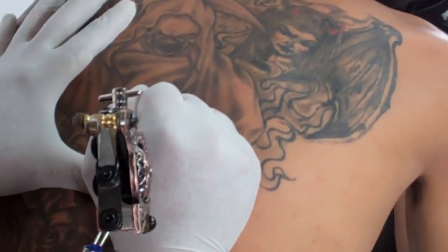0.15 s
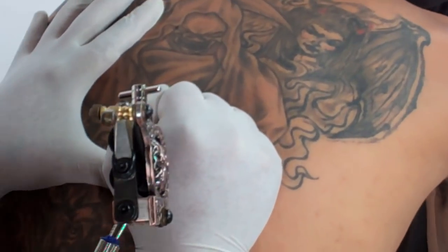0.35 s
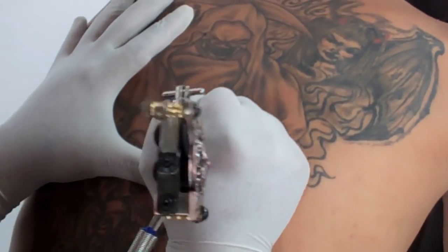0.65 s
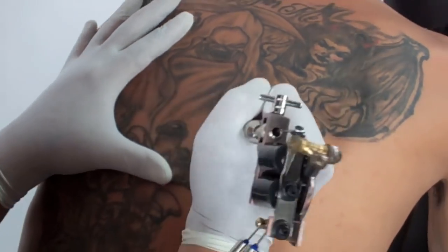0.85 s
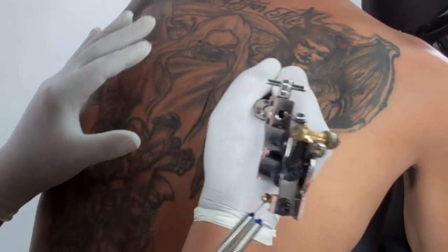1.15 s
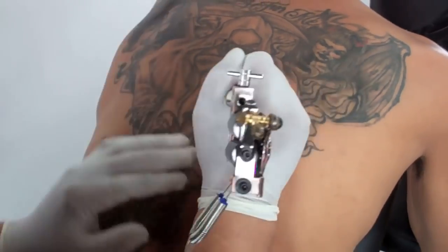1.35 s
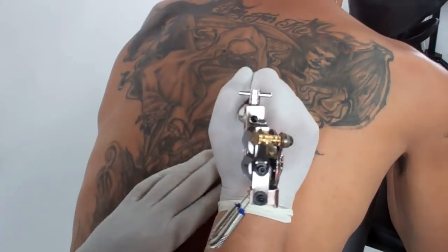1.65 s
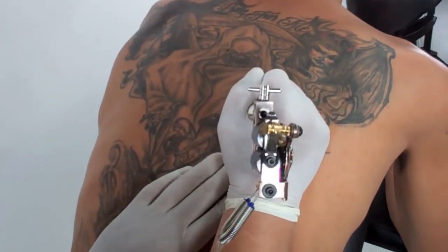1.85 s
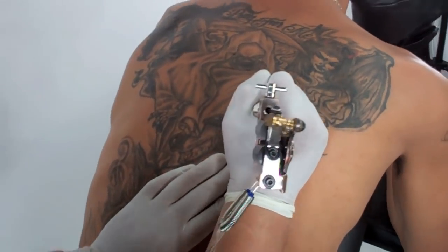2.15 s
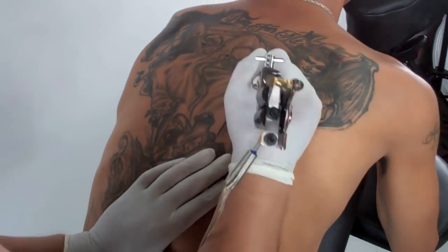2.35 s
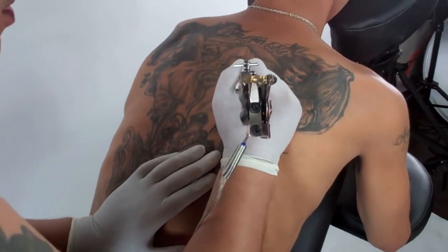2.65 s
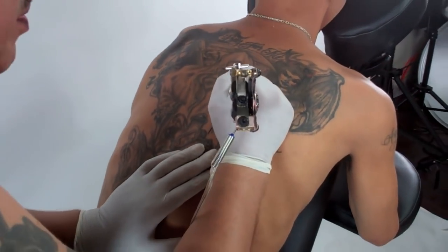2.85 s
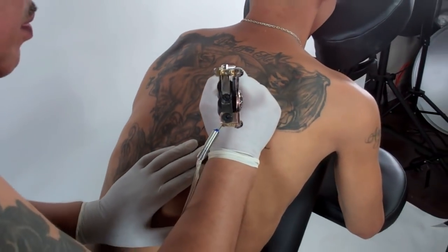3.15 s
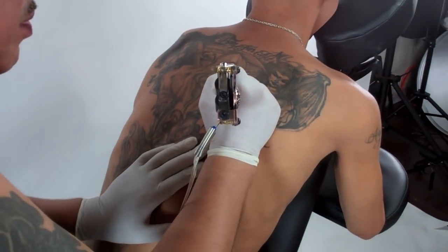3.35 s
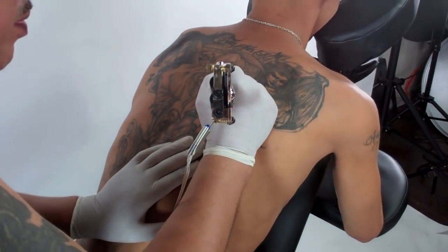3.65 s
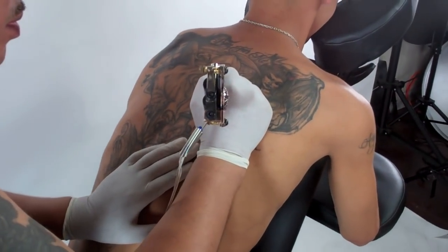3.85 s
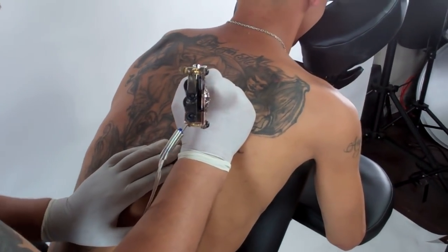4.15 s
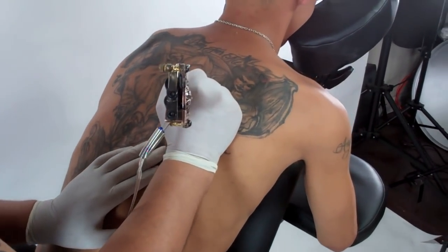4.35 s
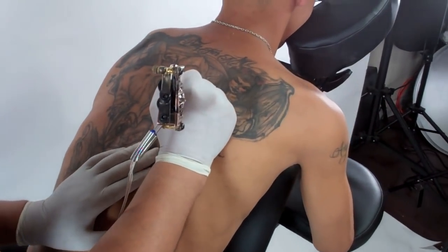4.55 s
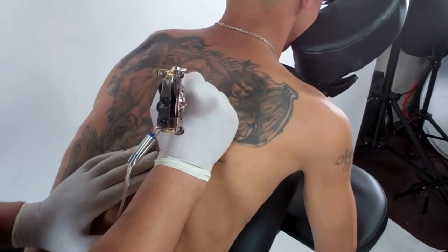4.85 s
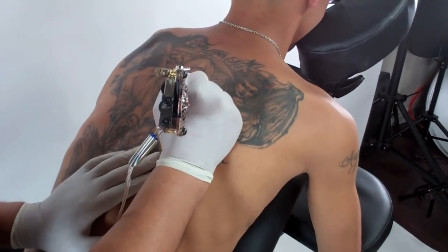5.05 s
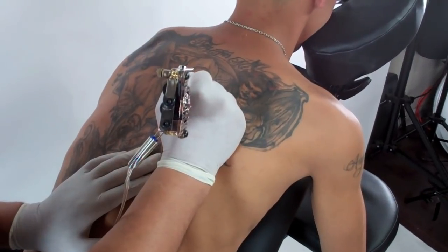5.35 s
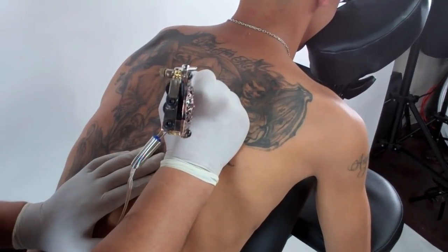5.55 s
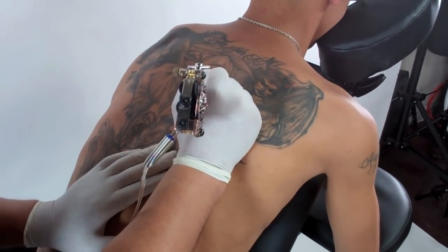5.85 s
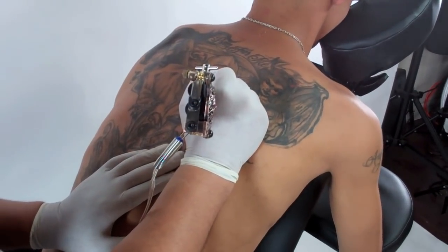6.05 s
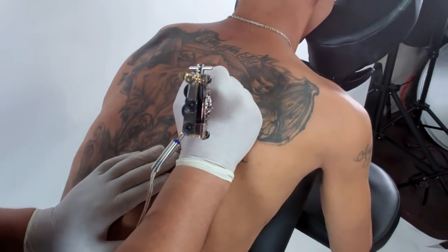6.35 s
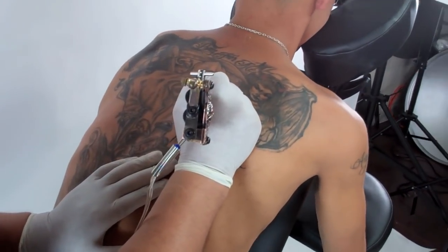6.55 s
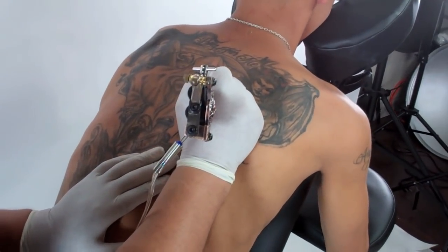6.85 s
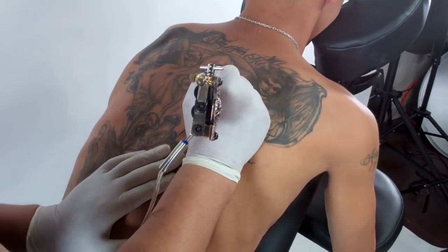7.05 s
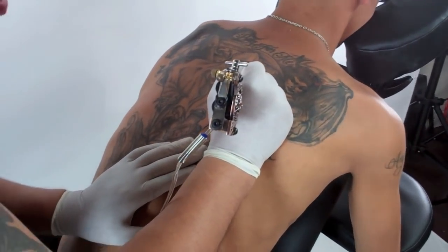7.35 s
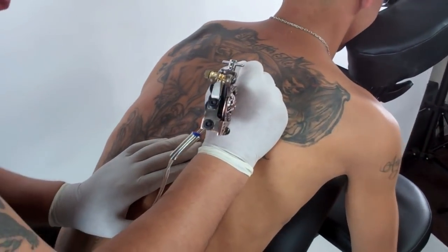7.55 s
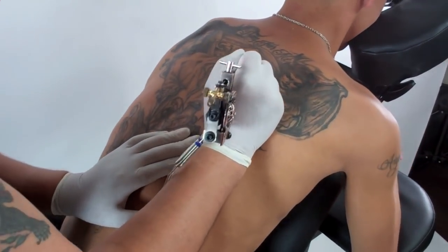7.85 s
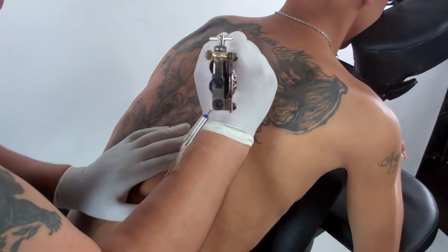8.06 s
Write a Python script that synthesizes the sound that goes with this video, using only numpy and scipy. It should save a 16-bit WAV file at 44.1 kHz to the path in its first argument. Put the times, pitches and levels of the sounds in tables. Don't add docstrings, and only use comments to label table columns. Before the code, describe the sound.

A coil tattoo machine buzzes harshly and continuously close by, bright and metallic, with sizzling hiss and low thumping over a faint room hum.

```python
import sys
import numpy as np
from scipy import signal
from scipy.fft import rfft, irfft, next_fast_len
from scipy.io import wavfile
from scipy.ndimage import uniform_filter1d

SR = 44100
rng = np.random.default_rng(int(sys.argv[2]) if len(sys.argv) > 2 else 0)


def gain_from_db(level_db):
    decades = np.asarray(level_db, float) / 20
    return 10 ** decades


def waveform_to_disk(signal):
    frames = np.transpose(np.atleast_2d(signal))
    scaled = np.clip(frames, -1, 1) * 32767
    samples = np.round(scaled).astype(np.int16)
    wavfile.write(sys.argv[1], SR, samples)


N = 362502


def evened(x):
    return x / np.sqrt(np.mean(x ** 2) + 1e-20)


def curves(rows):
    s, *columns = np.transpose(rows)
    t = np.arange(N) / SR
    return [np.interp(t, s, column) for column in columns]


def bells(x, centre, half):
    return np.exp(-.5 * ((x - np.c_[centre]) / np.c_[half]) ** 2)


def bumps(rows):
    s, half, *columns = np.transpose(rows)
    t = np.arange(0, N / SR + 1, 1 / 500)
    sums = np.array(columns) @ bells(t, s, half)
    return np.array(curves(np.c_[t, sums.T]))


def colour(x, points):
    size = next_fast_len(N)
    hz, db = np.transpose([(0.75, -59)] + list(points))
    log_hz = np.log(np.fft.rfftfreq(size, 1 / SR) + 1)
    gain = gain_from_db(np.interp(log_hz, np.log(hz), db))
    return irfft(rfft(x, size) * gain, size)[..., :N]


def pair(same, size=N):
    a, b = rng.standard_normal((2, size))
    same = np.clip(same, 0, 1)
    return np.array([a, same * a + np.sqrt(1 - same ** 2) * b])


def drift(seconds, size):
    knots = rng.standard_normal((size, N // 64 + 2))
    span = max(int(seconds * SR / 64), 1)
    knots = uniform_filter1d(uniform_filter1d(knots, span), span)
    return evened(np.array([np.interp(np.arange(N) / 64, np.arange(len(k)), k) for k in knots]))


def train(times, spread_db, wobble_s):
    chance, out = rng.standard_normal((len(times), 2)), np.zeros(N + SR)
    at = np.maximum((times + wobble_s * chance[:, 0]) * SR, 0).astype(int)
    out[at] = gain_from_db(spread_db * chance[:, 1])
    return out[:N]


def burst(clicks, rise_s, fall_s):
    t = np.arange(1500) / SR
    envelope = (1 - np.exp(-t / rise_s)) ** 2 * np.exp(-(t / fall_s) ** 1.6)
    return signal.oaconvolve(1. * clicks, envelope)[:N]


def pose():
    # t/s, nearness/dB, tilt that bares the low mode/dB,
    # roll that trades top mode for middle/dB, left minus right/dB
    held = [(0, 1.2, -3, .5, -2), (.5, 0, -5, 1, -0.5), (.76, 5, -3, 7, 0.5), (.92, -2.3, 2, -7, 0),
            (1.15, 1, -5, 9.5, -1.2), (1.75, 1.9, -7, 6, 0.2), (2.05, .1, -20, -6, -2), (2.4, 2, -2, 2, 0),
            (2.76, 1, 4, -1, -0.5), (3.1, 3.2, 2.5, 5.5, -1), (4.05, 3.3, 2, 5, -0.4), (5, 0.7, 4, 4, -.2),
            (5.35, 1.7, 3, 3, -0.2), (5.88, 0.3, 2.5, 2, 0.5), (6.5, -2.5, 3.5, 5, -1.5),
            (7.4, -2.3, 3.8, 3, -0.5), (7.62, -1, -0.5, 6, -0.3), (8.22, 0, -0.5, -5, -0.5)]
    # t/s, half length/s, nearness/dB, roll/dB
    twists = [(.6, 0.029, -5, 10), (.69, 0.022, 0.5, 3), (1.05, 0.034, -1, 8), (1.84, 0.011, -2, 5),
              (2.2, 0.019, -0.5, 5), (2.86, 0.021, -3, 6), (2.93, 0.043, 1, 3.5), (7.75, .06, 3, 0.5),
              (7.91, 0.02, 5, 1.8), (7.95, 0.018, 0.5, 2), (8.04, 0.014, 0, 3), (8.1, 0.017, 0, 7)]
    near_db, tilt_db, roll_db, pan_db = curves(held)
    nearer_db, rolled_db = bumps(twists)
    return near_db + nearer_db, tilt_db, roll_db + rolled_db, pan_db


def bending():
    # t/s, left peak/0.001, right peak/0.001
    aim = [(0, -4, 17), (.6, 8, 41), (.75, -16, 13), (2.8, -2.5, 17), (3.5, -7, 19), (4.4, 0.5, -9),
           (4.7, -6, 18), (5.5, -5, 16), (6.3, -16, 50), (7, -19, 64), (7.5, 22, 96), (8.22, 22, 43)]
    # t/s, half length/s, added left peak/0.001, added right peak/0.001
    facing = [(.1, .05, -1.5, 37), (.95, .1, 4, 107), (1.29, 0.089, -19, 70), (1.47, 0.3, 113, 18),
              (1.83, 0.056, -1, 73), (2, 0.081, 63, 115), (2.26, 0.083, 40, 103), (2.55, 0.095, 19, 31),
              (2.7, 0.034, 35, -2), (3.4, 0.075, -1, -12), (6.05, 0.084, 5, 9), (6.3, 0.066, 1, -8),
              (6.75, 0.056, 1, 8), (7.6, 0.084, -22, -30), (7.88, 0.12, 58, 22), (8.1, .05, 3, -16)]
    return np.array(curves(aim)) + bumps(facing)


def room():
    # f/Hz, level/dB
    hum = [(25, 22), (60, 33), (150, 12.5), (400, -37), (1000, -38), (3000, -41)]
    return gain_from_db(-62.5) * evened(colour(pair(0.076), list(hum) + [(20000, -50)]))


def sway():
    # f/Hz, level/dB
    rumble = [(20, -3), (40, 0), (60, -8), (120, -30), (20000, -90)]
    sway_db = -87
    return gain_from_db(sway_db) * (15 + abs(bending())) * evened(colour(pair(.05), rumble))


def rattle(hits):
    # f/Hz, level/dB
    hiss = [(300, -36.5), (700, -45), (1300, -29), (2500, -17.5), (4000, -14), (6500, -13), (9000, -9),
            (11000, -6), (12500, -2), (13600, 0), (14500, -2.5)]
    clumps = gain_from_db(1.68 * drift(.0012, size=1))
    gate = 1 + 0.36 * burst(hits, 0.00017, 0.0044)
    level_db = -20 - 0.34 * pose()[0]
    return gain_from_db(level_db) * evened(colour(pair(0.17) * clumps * gate, hiss))


def hit_times():
    stroke_s, short_s, first_s = .01367, .01111, .008
    # first early hit t/s, last early hit t/s, early hits/count
    stutters = [(0.1152, 0.1152, 1), (0.1264, 0.6588, 2), (0.821, 0.9665, 3), (1.1543, 1.6021, 2),
                (1.6269, 1.7478, 2), (1.9646, 2.0026, 2), (2.0685, 2.5044, 2), (2.5292, 2.6087, 2),
                (2.7157, 2.7927, 3), (3.01, 3.0349, 2), (3.101, 3.2496, 2), (3.5901, 3.7383, 2),
                (3.8317, 3.9083, 3), (3.9331, 4.0621, 4), (4.1005, 4.5473, 3), (4.7092, 4.7838, 4),
                (4.795, 5.0224, 3), (5.061, 5.1821, 2), (5.2478, 5.3336, 5), (5.372, 5.5775, 6),
                (5.7116, 5.791, 2), (5.8575, 5.8821, 2), (6.0164, 6.0825, 2), (6.1477, 6.2625, 4),
                (6.356, 6.8316, 12), (6.8701, 6.9446, 4), (7.0238, 7.2788, 8), (7.3583, 7.4055, 4),
                (7.4172, 8.0026, 2), (8.1224, 8.161, 2)]
    early = [first_s]
    for first, last, count in stutters:
        count = int(count)
        strokes = round((last - first - (count - 1) * short_s) / stroke_s)
        full = np.round(np.linspace(0, strokes, count))
        steps = full * stroke_s + np.arange(count) * short_s
        early += list(first + steps * (last - first) / max(steps[-1], short_s))
    ends = np.append(np.array(early[1:]) - short_s, early[-1] + 10 * stroke_s)
    runs = [np.linspace(a, b, round((b - a) / stroke_s) + 1) for a, b in zip(early, ends)]
    times = np.concatenate(runs)
    return times[times < N / SR]


def habits(hits, shape, same, seconds):
    out = np.zeros((2, N))
    shape = shape * gain_from_db(2.4 * rng.standard_normal(len(shape)))
    weights = drift(seconds, size=6)
    for weight in weights / np.linalg.norm(weights, axis=0):
        pattern = pair(same, size=len(shape)) * shape
        out += signal.oaconvolve((hits * weight)[None], pattern)[:, :N]
    return evened(out)


def chatter(hits, contacts):
    # f/Hz, level/dB
    bright = [(600, -36), (1200, -18), (2000, -17), (3000, -0.5), (5000, -5.5), (7000, -3), (9000, 2),
              (11000, -2), (13000, 8.5), (14500, 4)]
    # f/Hz, level/dB
    body = [(120, -1), (250, -2), (500, -1), (900, -2.5), (1500, -2.5), (2000, -4), (3000, -7.5),
            (20000, -15)]
    first = np.arange(N) == 0
    shape = (burst(first, 0.00017, 0.0022) + 0.089 * burst(first, 0.00086, 0.0016))[:600]
    envelope = burst(hits, 0.000094, 0.0014) + gain_from_db(-0.5) * burst(contacts, 0.00059, 0.00084)
    loose = evened(pair(0.78) * envelope)
    bounces = habits(hits, shape, .6, .2) + .55 * loose
    bounces = bounces + gain_from_db(-24) * evened(np.roll(hits, 6))
    knock = habits(hits, shape, 0.077, 0.21) + 0.67 * loose
    knock = knock + gain_from_db(-42) * evened(np.roll(hits, 12)) * np.c_[[1, .4]]
    level_db = -25.5 + 0.53 * pose()[0]
    knock_db = -13 + 0.0465 * bending().sum(0)
    bounces = gain_from_db(level_db - 0.38) * evened(colour(bounces, bright))
    return bounces + gain_from_db(level_db + knock_db - 2.0) * evened(colour(knock, body))


def ring(x, hz, width_hz):
    turn = np.exp(2j * np.pi * np.cumsum(hz * np.ones(N)) / SR)
    r = np.exp(-np.pi * width_hz / SR)
    double_pole = np.convolve([1, -r], [1, -r])
    return turn * signal.lfilter([1], double_pole, x * turn.conj())


def steel(hits, contacts):
    # f/Hz, width/Hz, level/dB
    side_modes = [(3933, 190, -50), (5240, 380, -46.5), (6350, 480, -46), (10200, 600, -37.5),
                  (10640, 330, -36.5), (13820, 300, -38.5), (14090, 200, -36)]
    # t/s, low bar mode f/Hz, middle bar mode f/Hz, top bar mode f/Hz, frame f/Hz
    main_hz = [(0, 11350, 12450, 13120, 1310), (.6, 11400, 12450, 13150, 1310),
               (1.1, 11400, 12350, 13150, 1290), (2.3, 11400, 12450, 13250, 1280),
               (2.8, 11350, 12350, 13200, 1300), (3.2, 11300, 12350, 13200, 1260),
               (4, 11250, 12450, 13350, 1250), (5, 11350, 12500, 13400, 1250),
               (6, 11350, 12450, 13400, 1270), (6.5, 11350, 12300, 13350, 1280),
               (7.6, 11450, 12250, 13400, 1270), (7.75, 11350, 12250, 13100, 1270),
               (8.22, 11350, 12300, 13150, 1280)]
    widths_hz = [410, 360, 524, 70]
    square_db = [-29, -32.5, -22]
    frame_db = -51.5
    drive = np.roll(hits, 10) + gain_from_db(-12.5) * contacts
    near_db, tilt_db, roll_db, _ = pose()
    turns_db = (tilt_db, roll_db, -0.41 * roll_db)
    bar_db = [db + near_db + turn_db for db, turn_db in zip(square_db, turns_db)]
    modes = list(zip(curves(main_hz), widths_hz, bar_db + [frame_db])) + list(side_modes)
    phases = .6 + .15 * drift(.5, size=len(modes))
    leans_db = .9 * drift(.4, size=len(modes))
    out = np.zeros((2, N), complex)
    for (hz, width_hz, db), phase, lean_db in zip(modes, phases, leans_db):
        z = ring(drive, hz, width_hz)
        z = 1.34 * gain_from_db(db) * z / np.sqrt(np.mean(abs(z) ** 2))
        path = gain_from_db(lean_db) * np.exp(1j * phase)
        out += [z * path, z / path]
    return out


def thumps(rung):
    power = uniform_filter1d(abs(rung) ** 2, 9)
    power = 0.16 * power + 0.99 * uniform_filter1d(power, 46)
    humps = 0.22 * power / uniform_filter1d(power, 2400) * 0.0011 * bending()
    return signal.lfilter(*signal.butter(1, 55, "high", fs=SR), humps)


def shade(x):
    # t/s, half length/s, f/Hz, level/dB
    swells = [(0.25, 0.18, 11000, 2), (0.33, 0.5, 1200, -2), (1.95, 0.069, 1100, -2), (2.3, 0.061, 610, -6),
              (6.303, 0.075, 760, 9), (6.7, 0.17, 240, 2), (6, .1, 780, 9), (6.6, 0.089, 800, -7.5),
              (2.02, 0.2, 2800, 1.5), (4.5, 0.2, 1700, -0.5), (7.85, 0.084, 1670, -7.5),
              (2.06, 0.3, 2300, -2.5), (2.17, 0.25, 8200, -2), (8, 0.18, 550, -6), (1.47, 0.38, 1360, 3.5),
              (2.6, 0.22, 5440, 1.5), (3.9, 0.5, 700, 4), (4.1, 0.67, 3700, -2), (4.8, 0.17, 600, -3.5),
              (5.75, 0.75, 3950, 1), (5, 1, 7700, 1), (6.2, 0.47, 480, 5), (6.6, 0.61, 1850, -1.5),
              (7.89, 0.13, 3100, 4)]
    hz, t, z = signal.stft(x, SR, nperseg=1024, noverlap=768)
    bands, holes = rng.standard_normal((2,) + z.shape[1:])
    bands = evened(uniform_filter1d(uniform_filter1d(bands, size=9, axis=0), size=70, axis=1))
    holes = evened(uniform_filter1d(uniform_filter1d(holes, size=4, axis=0), size=17, axis=1))
    distance = np.log(hz + 1) - np.log([[4800], [3900]])
    middle, thin = np.exp(-distance ** 2 / [[.5], [.45]])[..., None]
    shade_db = 1.3 * bands * middle - 30 * np.clip(5 * (holes * thin - .98), 0, 1)
    s, half, swell_hz, db = np.transpose(swells)
    swell_bands = bells(np.log2(hz + 1), np.log2(swell_hz), 0.31 + 0 * s)
    shade_db += swell_bands.T * db @ bells(t, s, half)
    return signal.istft(z * gain_from_db(shade_db), SR, nperseg=1024, noverlap=768)[1][:, :N]


def scene():
    contact_s = .0078
    times = hit_times()
    hits = train(times, 0.32, .000012)
    contacts = train(times + contact_s, 0.37, .00025)
    rung = steel(hits, contacts)
    machine = rung.imag + chatter(hits, contacts) + rattle(hits)
    pan_db = pose()[3]
    ears = gain_from_db(3.5 + np.array([pan_db / 2, -pan_db / 2]))
    return machine * ears + thumps(rung) + sway() + room()


def roll_off(x):
    return signal.sosfilt(signal.butter(12, 15900, fs=SR, output="sos"), x)


def record(dry):
    edge_hz = 14200
    rounded = shade(1.2 * np.tanh(dry / 1.2))
    filters = [signal.firwin(taps, edge_hz, window=("kaiser", 8), fs=SR) for taps in (1201, 67)]
    steep, soft = [signal.oaconvolve(rounded, fir[None], "same") for fir in filters]
    loudness = np.clip(uniform_filter1d(steep ** 2, size=130) / 0.092, 0, 1)
    leak = loudness ** 2 * gain_from_db(6.4 * drift(0.022, size=1))
    return roll_off(steep + gain_from_db(-8) * leak * (soft - steep))


dry = scene()
out = record(dry)
waveform_to_disk(out)
```